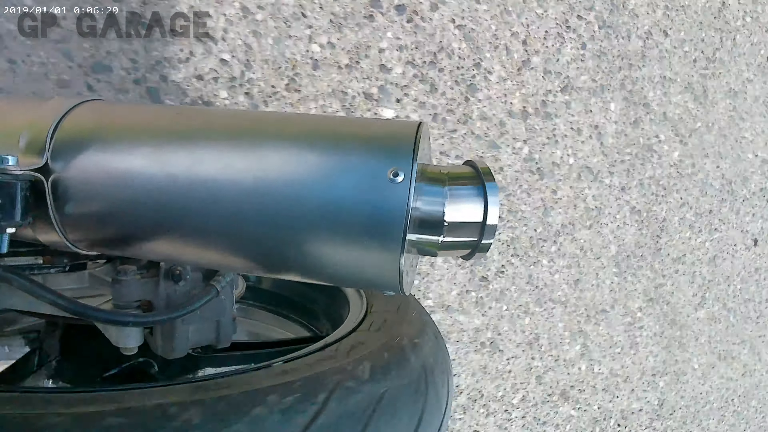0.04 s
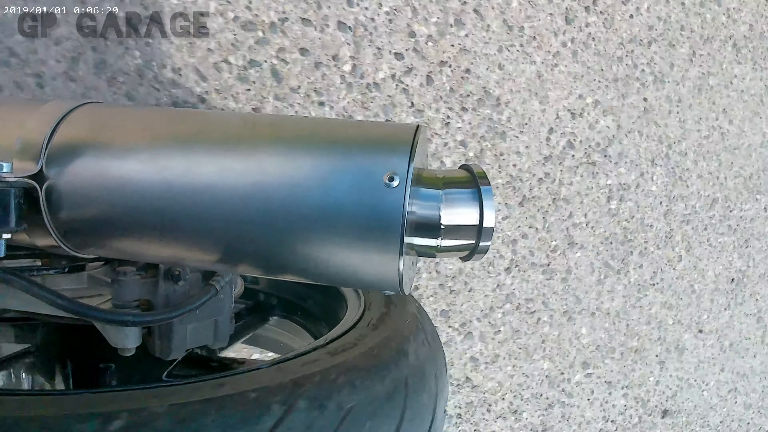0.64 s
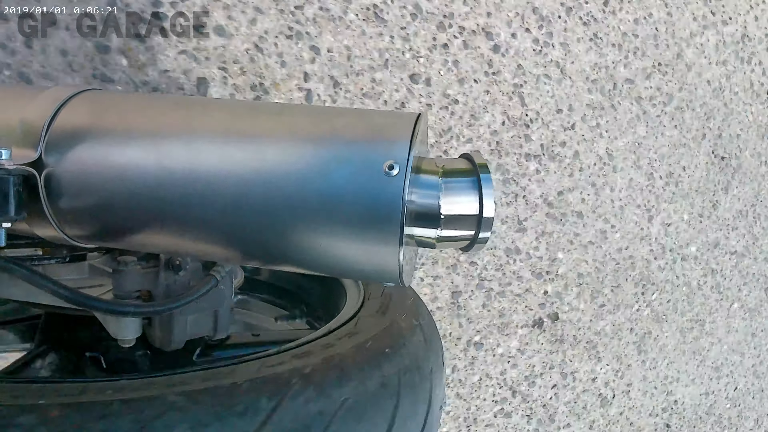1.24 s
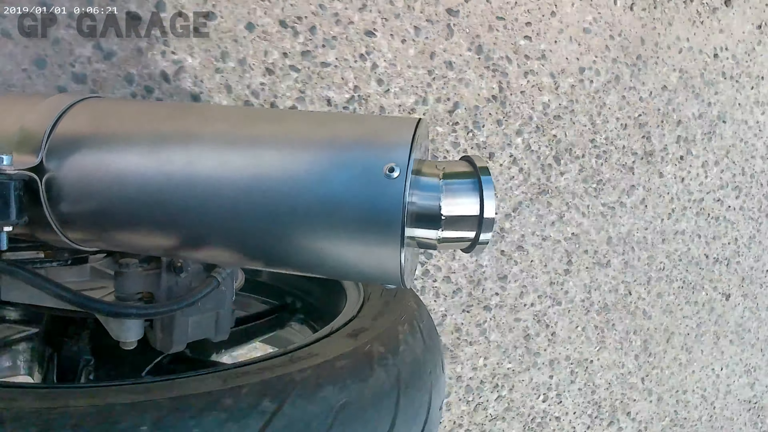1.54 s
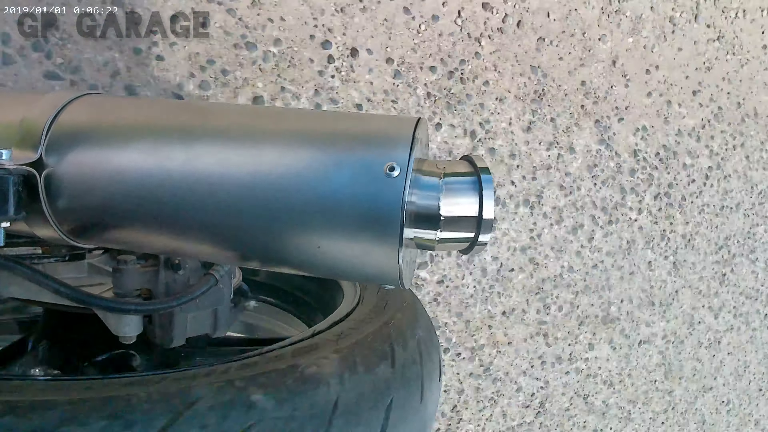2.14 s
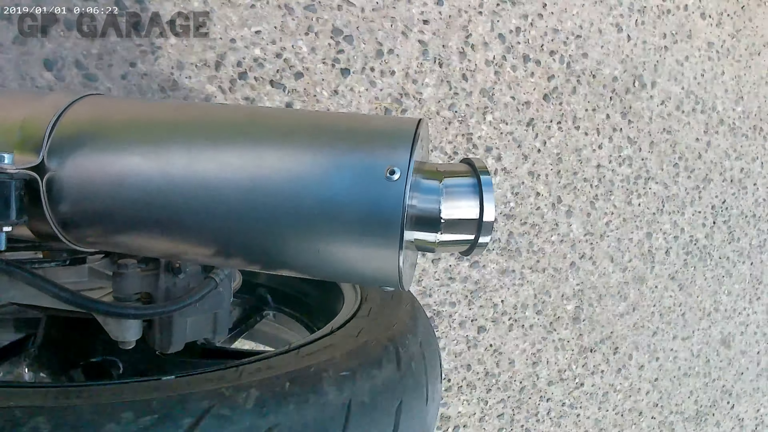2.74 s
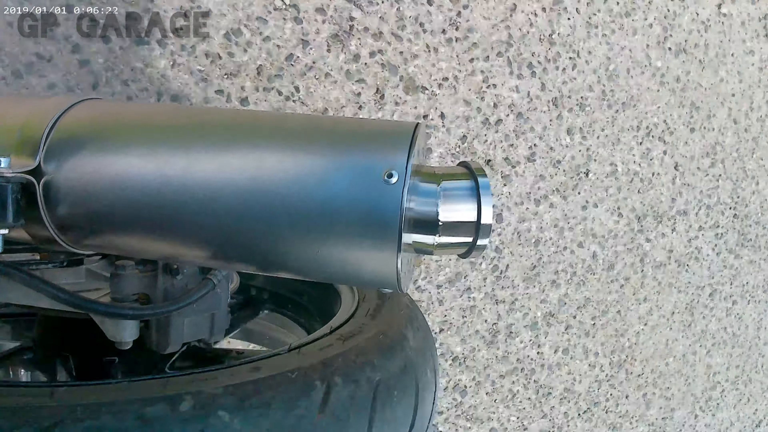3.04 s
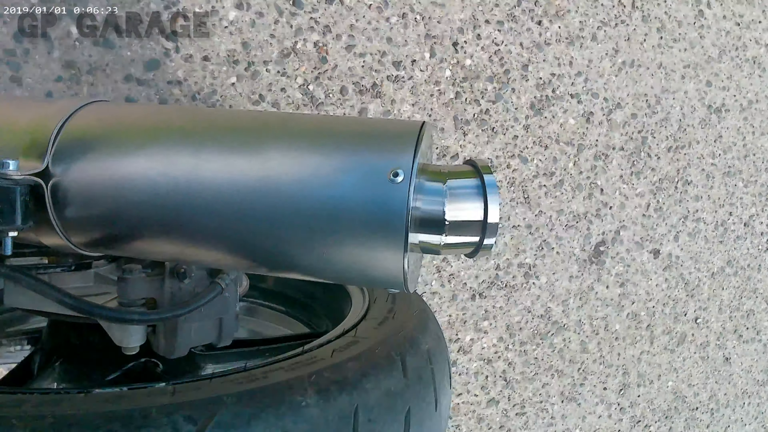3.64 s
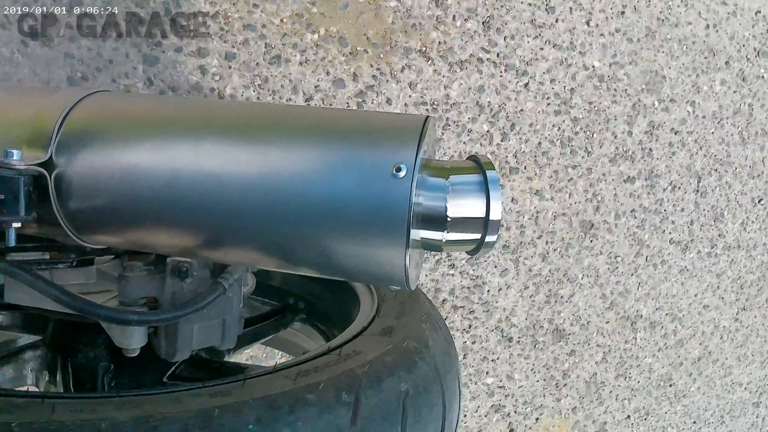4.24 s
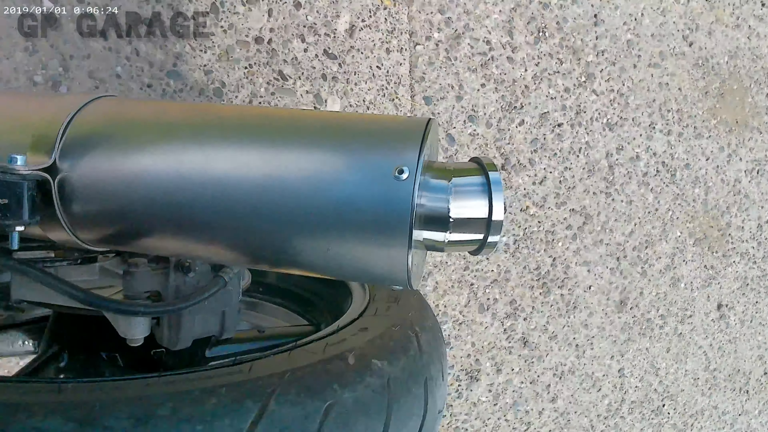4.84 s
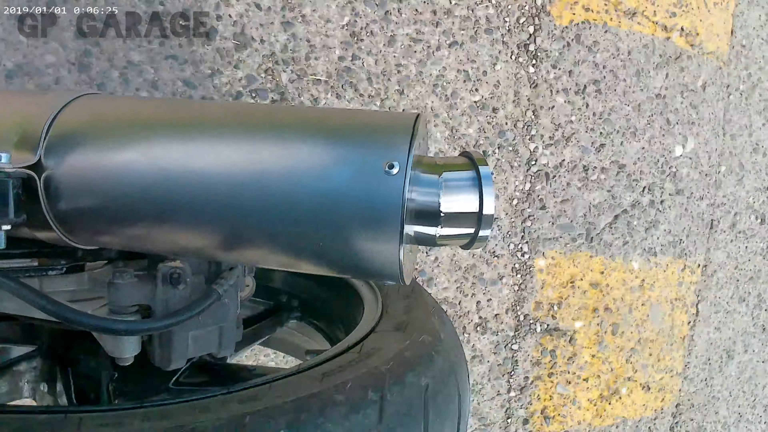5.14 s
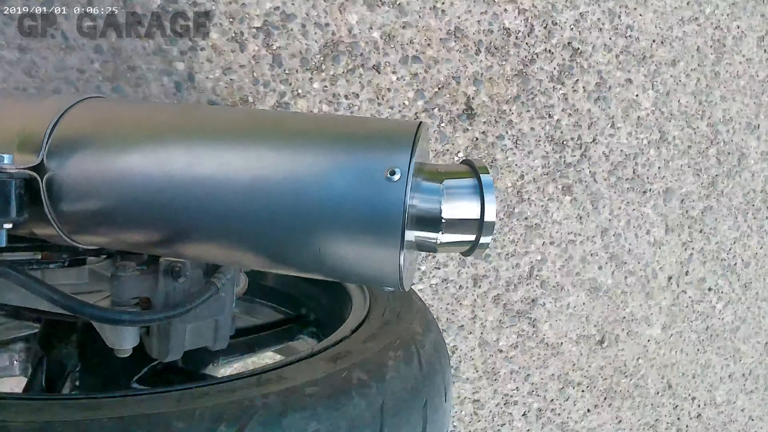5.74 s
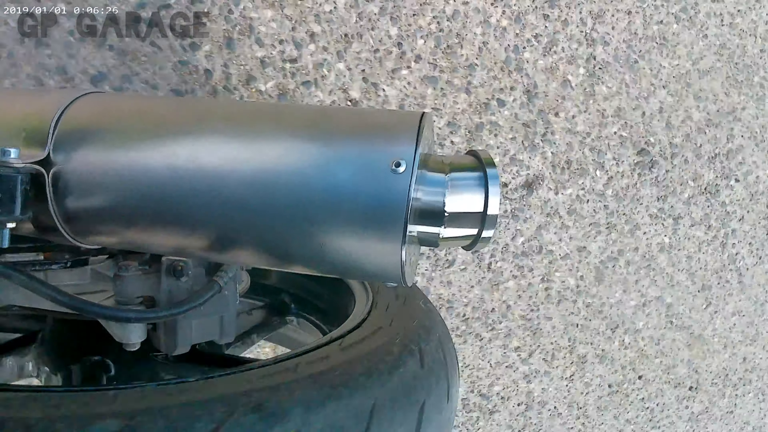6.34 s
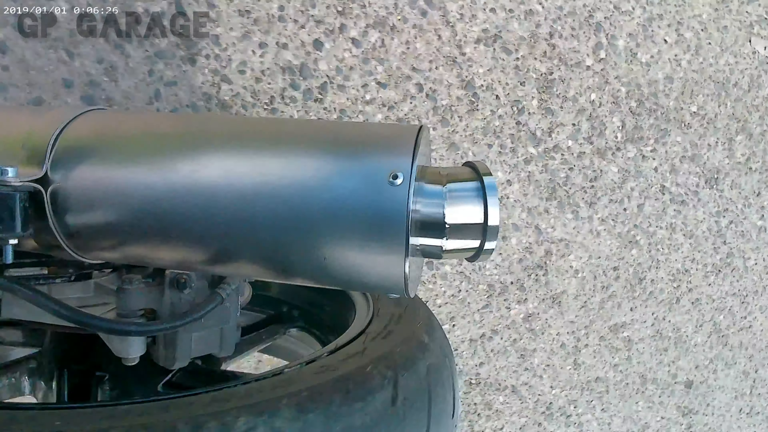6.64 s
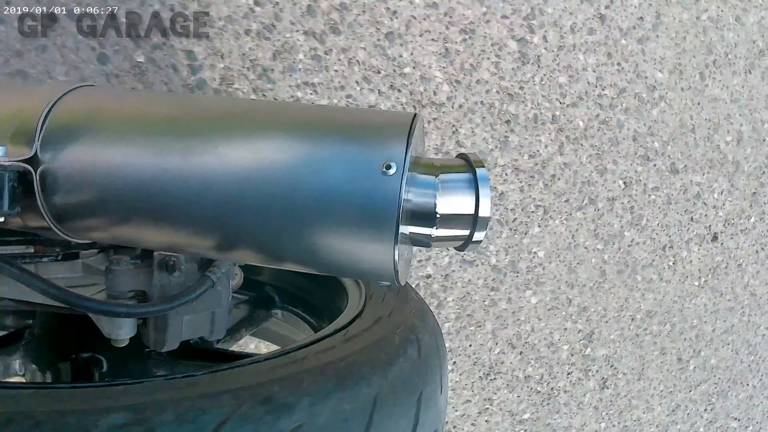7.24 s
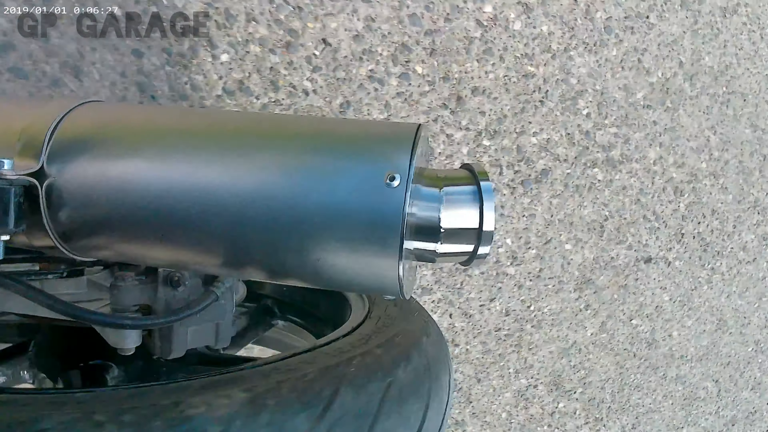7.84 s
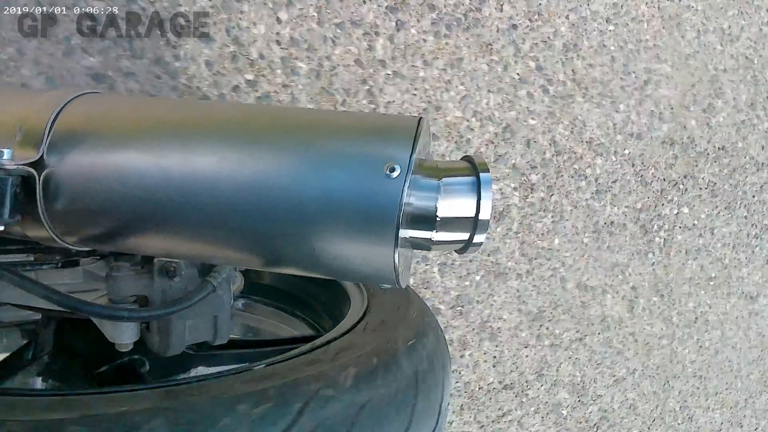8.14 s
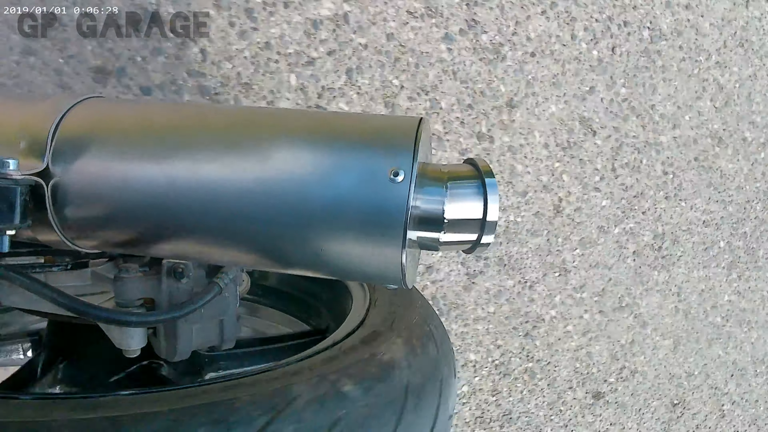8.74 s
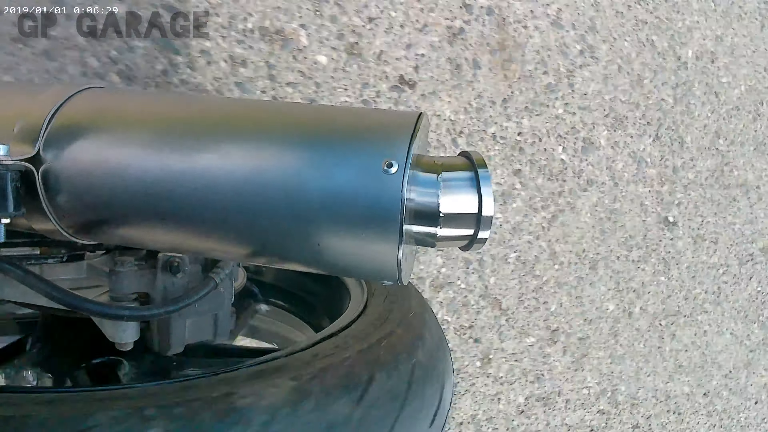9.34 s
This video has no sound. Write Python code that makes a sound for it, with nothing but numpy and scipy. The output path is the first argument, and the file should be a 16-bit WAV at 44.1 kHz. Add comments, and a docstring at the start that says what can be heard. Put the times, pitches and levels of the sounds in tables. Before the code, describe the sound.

Close beside the silencer, a lumpy motorcycle idle gives way to quick throttle blips and two loud, rasping climbs in pitch.

```python
"""A lumpy, misfiring idle from a four-cylinder motorcycle, the microphone close beside its silencer.
Two throttle blips and a faint third follow, then two hard pulls with a pop and a short overrun between.
Firing pulses ring the pipe and gas rasps at the outlet. Behind them the valve gear clatters,
gears whine and a thin whistle wavers, while moving air buffets the microphone."""
import sys
import numpy as np
from scipy import signal
from scipy.fft import rfft, irfft, next_fast_len
from scipy.io import wavfile
from scipy.ndimage import uniform_filter1d, map_coordinates

SR = 44100
rng = np.random.default_rng(int(sys.argv[2]) if len(sys.argv) > 2 else 0)


def materialize(psi):
    """Save the field psi as 16-bit PCM at rate SR to the path in sys.argv[1].

    A 1-D psi becomes a single channel; in a 2-D psi each row is a channel.
    """
    bounded = np.clip(np.atleast_2d(psi).T, -1, 1)
    quanta = np.round(bounded * 32767).astype(np.int16)
    wavfile.write(sys.argv[1], SR, quanta)


N = 414099
TIME = np.arange(N) / SR
THROTTLE_S = 4.24  # the idle ends here
# Mesh cycles per firing of the primary drive and of the two gears used in the pulls.
PRIMARY, FIRST_MESH, SECOND_MESH = 22.3, 15, 13
# Runs of hard firings at idle. Each row: start and end in seconds, firings per hard firing.
LOPES = [(.04, .261, 3), (.425, .614, 3), (.65, .835, 2), (.906, 1.123, 2), (1.234, 1.376, 2),
         (1.41, 1.572, 3), (1.627, 1.773, 2), (1.88, 2.077, 2), (2.177, 2.311, 2), (2.378, 2.45, 2),
         (2.598, 2.912, 2), (2.981, 3.154, 2), (3.262, 3.536, 2), (3.606, 3.746, 2), (3.816, 3.96, 2),
         (4.03, 4.103, 2)]
# Throttle blips. Each row: opening and shutting in seconds, top firings a second, drive in dB.
BLIPS = [(4.503, 4.6, 88, -10.5), (4.77, 4.865, 77, -12), (5.14, 5.262, 63, -19)]


def idle(cycles, hard_db=-9.5, weak_db=-16, stagger_s=.0014, lead_s=.00098, miss_share=.15, burble=.28):
    """Cylinders burn in loping groups: hard firings with weaker ones between, some nearly missing."""
    runs = []
    for start, end, every in LOPES:
        first, last = np.interp([start, end], TIME, cycles)
        runs.append(np.linspace(first, last, round((last - first) / every) + 1))
    hard_s = np.interp(np.concatenate(runs), cycles, TIME)
    hard_s += stagger_s * rng.standard_normal(len(hard_s))
    hard = amp(hard_db + 2.5 * rng.standard_normal(len(hard_s)))
    # weak firings fill the gaps at the pace of the crank
    marks_s = np.concatenate([[0], hard_s, [THROTTLE_S]])
    steps = np.maximum(1, np.round(np.diff(np.interp(marks_s, TIME, cycles))))
    counts = np.concatenate([[0], np.cumsum(steps)])
    between = np.setdiff1d(np.arange(counts[-1]), counts)
    weak_s = np.interp(between, counts, marks_s)
    weak = amp(weak_db + 2 * np.clip(rng.standard_normal(len(weak_s)), -2, 1))
    weak *= np.where(rng.random(len(weak)) < miss_share, .3, 1)
    train = pulses(weak_s - lead_s, weak) + pulses(hard_s - lead_s, hard)
    return pipe(train + burble * afterflow(train))


def revs(cycles, speed, drive_db, jitter_s_per_db=.00003, burble=.34):
    """Under throttle every cylinder fires; load and speed heat the pipe and shift its voice."""
    # Relative strength of each of the four cylinders in dB.
    cylinders = [0.59, -1.68, 0.66, -0.47]
    fire_s = firing_times(cycles)
    fire_s = fire_s[fire_s > THROTTLE_S]
    size_draw, time_draw = rng.standard_normal((len(fire_s), 2)).T
    rough = roughness(speed)
    scatter_db = np.interp(fire_s, TIME, rough)
    # the cylinders differ most at high speed, which puts lines between the firing orders
    imbalance = np.interp(np.interp(fire_s, TIME, speed), [60, 100, 116], [.7, .8, 2])
    sizes = amp(imbalance * np.resize(cylinders, len(fire_s)) + scatter_db * size_draw)
    train = pulses(fire_s + jitter_s_per_db * scatter_db * time_draw, sizes)
    train += burble * rough * afterflow(train)
    load = 1 / (.5 + np.exp((-16 - drive_db) / 4))
    fast = np.interp(speed, [90, 112], [0, 1])
    note = pipe(train * (1 - load), heat=1.01)
    note += pipe(train * load * (1 - fast), voice=1, heat=1.0243, edge_hz=479)
    note += pipe(train * load * fast, voice=2, heat=1.071, edge_hz=511)
    return steady(note) * amp(drive_db + 1.22 + .85 * load) * (TIME > THROTTLE_S)


def engine_speed(stumble_sag=3.5, inertia_s=.06, coast_s=.135, rest_speed=51):
    """Firings a second: the crank sags between lopes, spins up and coasts in each blip, then pulls."""
    # The idle settles, then creeps up. Each row: time in seconds, firings a second.
    idle_speed = [(0, 87), (.2, 68), (.35, 61.5), (.7, 55.5), (1.7, 56.5), (2.05, 59.5), (3.6, 58.5),
                  (4.1, 55.5), (4.24, 63.9), (4.36, 65.1), (4.5, 68.8)]
    # One list per pull. Each row: time in seconds, firings a second.
    pull_speed = [
        [(5.45, 56.7), (6.01, 74.7), (6.61, 97.5), (7.0, 114.6), (7.19, 121.3), (7.34, 115.6), (7.54, 93.43)],
        [(7.65, 77.6), (7.8, 95.2), (7.87, 90), (8.09, 87.3), (9.16, 115.9), (9.39, 118)],
    ]
    stumbles = sum(1. * ((TIME > lope[1]) & (TIME < after[0])) for lope, after in zip(LOPES, LOPES[1:]))
    speed = curve(idle_speed) - stumble_sag * smooth(stumbles, inertia_s)
    for opens, shuts, top, _ in BLIPS:
        rise = np.interp(TIME, [opens, shuts], [np.interp(opens, TIME, speed), top])
        coast = np.exp(-np.maximum(TIME - shuts, 0) / coast_s)
        speed = np.where(TIME < opens, speed, rest_speed + (rise - rest_speed) * coast)
    pulls = np.concatenate(pull_speed)
    return smooth(np.where(TIME < pulls[0, 0], speed, curve(pulls)), .02)


def drive(light_db=-21.5, attack_s=.044, release_s=.07):
    """How hard the pipe is driven, in dB: a swell from light throttle for each blip, then the pulls."""
    # First pull, overrun and second pull. Each row: time in seconds, drive in dB.
    pull_drive = [
        [(5.45, -18), (5.664, -19), (5.81, -10), (6.22, -11.5), (6.42, -6.5), (6.712, -5.5), (6.906, -12.5),
         (7.17, -11), (7.2, -13)],
        [(7.25, -15), (7.59, -23), (7.6, -27)],
        [(7.63, -26), (7.658, -13.5), (7.746, -13), (7.78, -5.5), (7.888, -10.5), (7.918, -10), (8.296, -5),
         (9.04, -11.5), (9.174, -11), (9.39, -11.5)],
    ]
    blips = [curve([(opens, light_db), (opens + attack_s, db),
                    (shuts, db), (shuts + release_s, light_db)]) for opens, shuts, _, db in BLIPS]
    pulls = np.concatenate(pull_drive)
    return np.where(TIME < pulls[0, 0], np.max(blips, axis=0), curve(pulls))


def firing_times(cycles):
    """Moments at which an exhaust valve opens."""
    return TIME[1:][np.diff(np.floor(cycles)) > 0]


def roughness(speed, firm_db=.42, coast_db=3, full_slowing=65):
    """Scatter of firing strength in dB: burning turns uneven when the engine slows from high speed."""
    slowing = np.clip(-np.gradient(speed) * SR / full_slowing, 0, 1)
    return firm_db + coast_db * slowing * np.interp(speed, [75, 98], [.15, 1])


def afterflow(train, decay_s=.019):
    """Each firing trails a turbulent gust as strong as the pulse itself."""
    keep = np.exp(-1 / (decay_s * SR))
    energy = signal.lfilter([1 - keep], [1, -keep], train ** 2)
    return np.sqrt(energy) * rng.standard_normal(N)


def pipe(train, voice=0, heat=.94, edge_hz=470):
    """Blunt pressure pulses ring the standing waves, which hotter gas tunes upward."""
    # Modes of pipe and silencer. Each row: frequency in Hz before heat scales it, width in Hz,
    # then relative dB for three voices: throttle shut, pulling, high speed.
    modes = [(60.5, 24, 1, -20, -34.5), (144, 34.8, 0.5, -3.5, -0.5), (239, 130, -24, -15, -33.5),
             (269.8, 22.6, 10, 7.5, 10), (355.2, 33, -24.5, -6.5, 5), (370.7, 12.4, -2.5, -6, 3.5),
             (467, 8.4, -29.5, -20.5, -7.5)]
    t = TIME[:SR // 5]
    ring = sum(amp(db[voice]) * width * np.exp(-np.pi * width * t) * np.cos(2 * np.pi * hz * heat * t)
               for hz, width, *db in modes)
    response = signal.sosfilt(signal.butter(6, edge_hz, fs=SR, output="sos"), ring)
    return signal.oaconvolve(train, response / np.abs(response).max())[:N]


def steepen(note, lean_s=.00005):
    """Crests travel faster than troughs, so loud waves lean forward and gain overtones."""
    return note + lean_s * SR * note * np.gradient(note)


def rasp(note, cycles, speed, drive_db, puff_db=5, puff_lag=.059, hiss_db=-31, sizzle_from=.68):
    """Turbulence at the outlet comes in one puff per firing; the strongest crests sizzle."""
    # Gas noise at a drive of -10 dB. Each row: firings a second, level in dB.
    gas_level = [(58, -42.5), (88, -39.5), (98, -31.5), (118, -33)]
    # Colours of the jet and of its sizzle. Each row: frequency in Hz, relative level in dB.
    jet_colour = [(100, -19.5), (350, -1.5), (700, 7.5), (950, 2.5), (1400, -0.5), (2200, -8),
                  (3200, -14.5), (5000, -21.5), (8000, -33.5), (15000, -50)]
    sizzle_colour = [(400, -21), (1000, 10), (2500, -7.5), (5000, -13.5), (8000, -16), (15000, -27)]
    jet = noise(jet_colour)
    flow = amp(puff_db * np.cos(2 * np.pi * (cycles - puff_lag)) + 1.4 * wobble(120))
    level_db = np.interp(speed, *np.transpose(gas_level)) + 1.3 * (drive_db + 10)
    puffs = (steady(flow * jet) + bark(cycles)) * amp(level_db)
    crests = np.clip(smooth(np.abs(note), .0004) / sizzle_from - 1, 0, .3)
    sizzle = crests * amp(-27 + 3.5 * wobble(90)) * noise(sizzle_colour)
    return puffs + amp(hiss_db) * note * jet + sizzle


def bark(cycles, band_hz=(770, 1110), scatter_db=4.5, delay_s=.0015):
    """The steep front of every pulse gives the rasp a crisp, pitched edge."""
    fire_s = firing_times(cycles)
    fronts = pulses(fire_s + delay_s, amp(scatter_db * rng.standard_normal(len(fire_s))))
    return steady(signal.sosfilt(signal.butter(2, band_hz, "band", fs=SR, output="sos"), fronts))


def pops(gain_db=-2.5, ticks_per_s=1.2):
    """Sharp cracks die away in the silencer; fainter ticks come at random while the engine idles."""
    # Exhaust cracks. Each row: start in seconds, relative level in dB, seconds to fall 60 dB.
    cracks = [(1.5341, -22, 0.028), (2.1299, -14.5, 0.024), (2.173, -24, 0.037), (2.767, -24.5, 0.02),
              (4.0445, -24.5, 0.047), (4.201, -28.5, .025), (4.4922, -22, 0.029), (4.5727, -22, 0.0091),
              (4.8265, -13, .025), (7.3159, -8, 0.044), (7.3334, -12, .03)]
    # Their colour. Each row: frequency in Hz, relative level in dB.
    crack_colour = [(150, -9.5), (600, 14), (1800, 0.5), (4000, -15.5), (6500, -26.5), (15000, -52)]
    ticks = [(start, -34, .07) for start in rng.uniform(0, THROTTLE_S, round(ticks_per_s * THROTTLE_S))]
    envelope, age = np.zeros(N), TIME[:SR // 10]
    for start, db, t60 in list(cracks) + ticks:
        envelope[round(start * SR):][:len(age)] += amp(db + gain_db - 60 * age / t60)
    return envelope * noise(crack_colour)


def clatter(cycles, speed, early_db=4.5, settle_s=1.2):
    """Valve gear and chain rattle in step with the crank and ring the casings, louder at the start."""
    # Settled clatter. Each row: firings a second, level in dB.
    rattle_level = [(56, -39), (70, -38), (90, -31), (120, -27)]
    # Colour of the rattling metal. Each row: frequency in Hz, relative level in dB.
    metal_colour = [(150, -25), (500, 8.5), (900, -0.5), (1200, -1.5), (1600, -4.5), (2500, -13),
                    (3100, -18.5), (4500, -21.5), (6300, -25.5), (7800, -32), (15000, -37.5)]
    ticking = amp(.5 * np.cos(2 * np.pi * cycles) + 1.1 * wobble(90))
    level_db = np.interp(speed, *np.transpose(rattle_level)) + early_db * np.exp(-TIME / settle_s)
    return unit(casing(ticking * noise(metal_colour))) * amp(level_db)


def whine(cycles, speed, backlash=.99, flutter_db=3.5, fade_s=.094, octave_db=16.5, idle_speed=56):
    """Gear meshes sing at multiples of the crank speed, blurred by backlash, louder as they speed up."""
    # Spells of whine. Each row: start and end in seconds, mesh cycles per firing, relative level in dB.
    spells = [(.25, 1.95, PRIMARY, -35.5), (1.95, 4.3, PRIMARY, -49.5), (5.6, 6.6, PRIMARY, -50),
              (8.35, 8.65, PRIMARY, -46.5), (6.6, 7.25, FIRST_MESH, -50), (8.199, 9.15, SECOND_MESH, -45.5)]
    meshes = np.zeros(N)
    for start, end, mesh, db in spells:
        tone = np.sin(2 * np.pi * mesh * cycles + backlash * (wobble(160) + 2 * wobble(22)))
        gate = smooth(1. * ((TIME >= start) & (TIME <= end)), fade_s)
        meshes += tone * gate * amp(db + flutter_db * wobble(60))
    return casing(meshes) * amp(octave_db * np.log2(speed / idle_speed) - 1)


def casing(vibration):
    """Vibration reaches the air through the ringing metal casings."""
    # Casing modes. Each row: frequency in Hz, width in Hz, strength in dB.
    modes = [(1093, 45, 2), (1874, 17, 1.5), (2174, 11, 4.5), (2510, 77, -2.5)]
    return filtered(vibration, lambda f: 1 + sum(
        amp(db) * 1j * f * width / (hz * hz - f * f + 1j * f * width) for hz, width, db in modes))


def buffet(gain_db=5, gust_db=2):
    """Moving air thumps on the microphone."""
    # Strength of the buffeting. Each row: time in seconds, relative level in dB.
    air_level = [(0.1, -29), (0.25, -26.5), (3.43, -40.5), (5.05, -31), (5.51, -41.5), (7.4, -28),
                 (7.76, -33.5), (7.79, -34), (9.2, -26), (9.3, -30.5)]
    # Colour of the rumble. Each row: frequency in Hz, relative level in dB.
    air_colour = [(8, -8.5), (25, -3.5), (50, 1), (100, -6.5), (200, -10.5), (500, -26.5), (1500, -75)]
    gusts = noise(air_colour) * amp(gust_db * wobble(12))
    return unit(gusts) * amp(curve(air_level) + gain_db)


def whistle(waver_hz=70, flutter_db=1.5, level_db=-64):
    """A thin, hoarse note from the running engine wavers high above the rest."""
    # Centre of the whistle. Each row: time in seconds, frequency in Hz.
    pitch = [(0, 5130), (1.8, 4910), (2.2, 5120), (3.6, 5170), (4.25, 4650), (4.9, 4670), (5.4, 5210),
             (7.2, 5230), (7.6, 4900)]
    hz = curve(pitch) + waver_hz * (wobble(10) + 2 * wobble(400) + wobble(120))
    return np.sin(2 * np.pi * np.cumsum(hz) / SR) * amp(level_db + flutter_db * wobble(22))


def amp(db):
    return 10 ** (np.asarray(db) / 20)


def unit(x):
    return x / np.sqrt(np.mean(x ** 2) + 1e-20)


def curve(rows):
    """One value per sample from (seconds, value) rows."""
    return np.interp(TIME, *np.transpose(rows))


def wobble(rate):
    """A smooth random curve, rate knots a second."""
    grid = np.arange(0, N * rate / SR + 1, 1 / 8)
    knots = rng.standard_normal(int(grid[-1]) + 4)
    return np.interp(TIME * rate, grid, map_coordinates(knots, [grid]))


def smooth(x, seconds):
    """Triangular running mean."""
    size = max(1, int(seconds * SR))
    return uniform_filter1d(uniform_filter1d(x, size), size)


def steady(x):
    """x held at rms 1 over a few firings."""
    return x / np.sqrt(np.abs(smooth(x ** 2, .04)) + 1e-12)


def filtered(x, response):
    """x shaped by a response of frequency."""
    size = next_fast_len(N + SR // 2)
    return irfft(rfft(x, size) * response(np.fft.rfftfreq(size, 1 / SR)), size)[:N]


def noise(colour):
    """Noise of rms 1, coloured by (Hz, dB) rows on a log axis."""
    hz, db = np.transpose(colour)
    white = rng.standard_normal(N)
    return unit(filtered(white, lambda f: amp(np.interp(np.log(f + 1), np.log(hz), db))))


def pulses(seconds, sizes):
    """Single pulses at the given times."""
    return np.bincount(np.clip(np.round(seconds * SR).astype(int), 0, N - 1), sizes, N)


def overload(x, top, order):
    """The biggest swings flatten at their crests."""
    return x / (1 + np.abs(x / top) ** order) ** (1 / order)


def scene():
    """Beside the silencer: exhaust and machinery follow the crank, with air on the microphone."""
    speed, drive_db = engine_speed(), drive()
    cycles = np.cumsum(speed * (1 + .0017 * wobble(25))) / SR  # one cycle per firing
    note = idle(cycles) + revs(cycles, speed, drive_db)
    boom = overload(steepen(note) + buffet(), top=.72, order=10)
    outlet = rasp(note, cycles, speed, drive_db) + pops()
    machinery = clatter(cycles, speed) + whine(cycles, speed) + whistle()
    return (boom + outlet + machinery)[None]


def record(dry):
    """One close microphone: the highest peaks round off and nothing passes above its band limit."""
    return np.array([filtered(overload(x, top=1.0, order=24), lambda hz: hz < 15750) for x in dry])


dry = scene()
out = record(dry)
materialize(out)
```